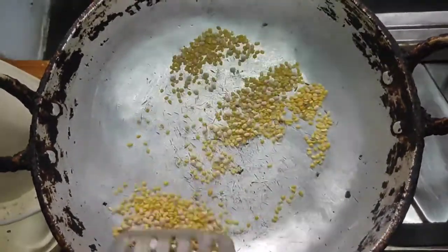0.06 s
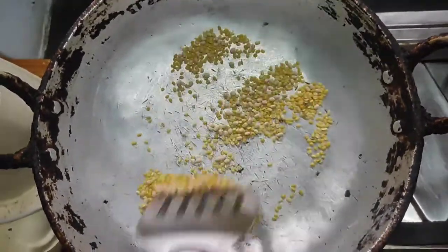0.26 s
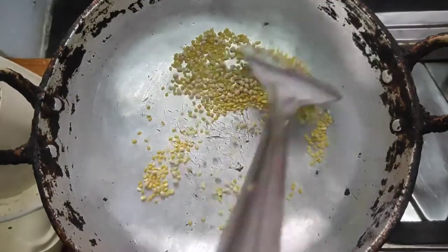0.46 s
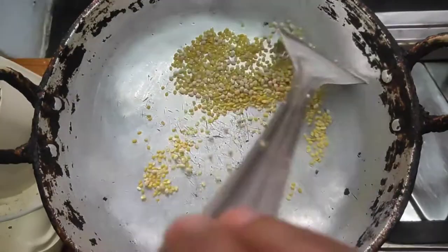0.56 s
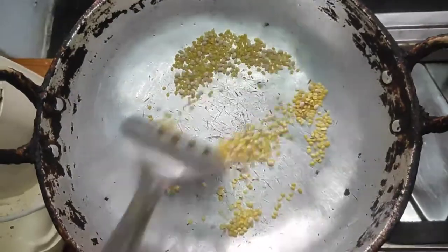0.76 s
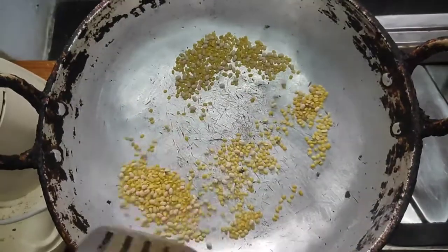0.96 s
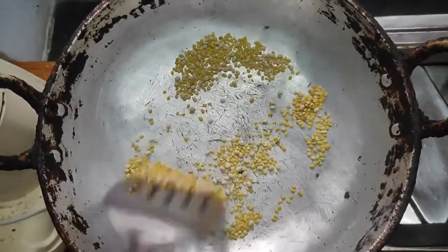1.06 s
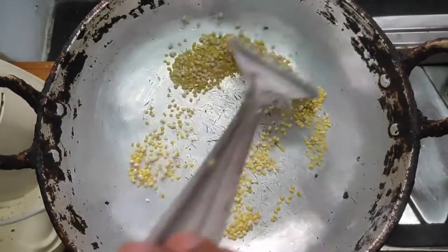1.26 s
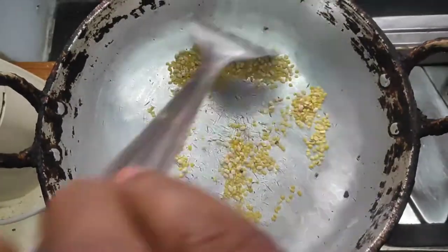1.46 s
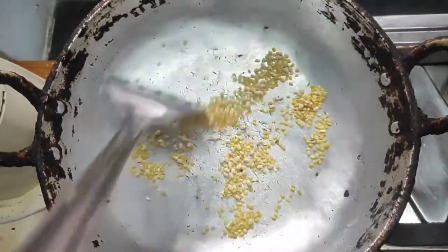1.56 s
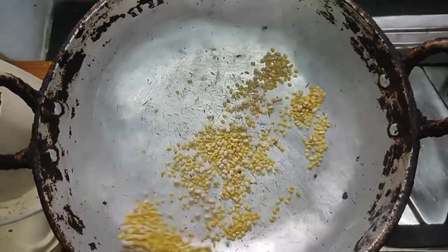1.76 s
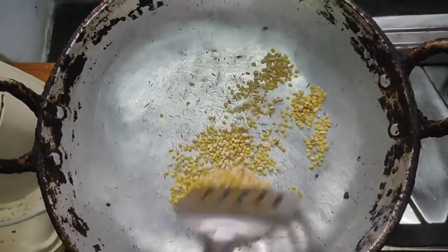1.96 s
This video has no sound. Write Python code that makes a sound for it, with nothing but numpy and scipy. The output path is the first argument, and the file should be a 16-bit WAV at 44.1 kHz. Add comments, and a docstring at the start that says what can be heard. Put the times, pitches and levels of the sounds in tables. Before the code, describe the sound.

A steel spatula knocks and scrapes in a metal pan, heard up close in a small kitchen. Strokes land at about 0.2, 0.6, 1.0 and 1.4 seconds, each with a chattering clank, brief ringing and tiny squeaks. Dry lentils slide and patter softly throughout, continuing after the scraping stops near 1.6 seconds. A soft, dull rub follows at 1.9 seconds, over a faint burner rush and hum.

```python
"""Stirring lentils in a pan

A slotted steel spatula stirs dry lentils in a metal pan on a stove, heard from just above the pan.
Each stroke lands with a chattering knock and scrapes on, ringing the pan; the lentils slide and patter.
The steel edge squeaks, hard pushes rock the pan, and at the end the spatula rubs over the rim.
A small kitchen echoes, over a faint hum and the low rush of the burner."""
import sys
import numpy as np
from scipy import signal
from scipy.fft import rfft, irfft, next_fast_len
from scipy.io import wavfile
from scipy.ndimage import map_coordinates

SR = 44100
rng = np.random.default_rng(int(sys.argv[2]) if len(sys.argv) > 2 else 0)


def generate_wav(sig):
    """Save sig (samples, or channels by samples) to the path in sys.argv[1] as 16-bit PCM at SR."""
    pcm = np.round(np.clip(np.atleast_2d(sig).T, -1, 1) * 32767).astype(np.int16)
    wavfile.write(sys.argv[1], SR, pcm)


N = 88200
RING = SR // 2  # samples allowed for a ring to die away
TOP_HZ = 8700


def amp(db):
    """Turn decibels into a gain."""
    return 10 ** (np.asarray(db) / 20)


def unit(x):
    """Scale a sound to an average (rms) level of 1."""
    return x / np.sqrt(np.mean(x ** 2) + 1e-20)


def along(points, hz):
    """Read between (f/Hz, value) points on a log frequency axis."""
    f, values = np.transpose(points)
    return np.interp(np.log(hz + 1), np.log(f + 1), values)


def sides(db):
    """Left and right gains for a balance in dB; positive is louder on the left."""
    return amp(np.array([[db], [-db]]) / 2)


def add(out, start_s, x):
    """Mix x into out at the given time."""
    i = round(start_s * SR)
    out[:, i:i + x.shape[1]] += x[:, :N - i]


def colour(x, points):
    """Shape the tone by (f/Hz, level/dB) points, with no ringing ahead of a hit."""
    n = x.shape[-1]
    m = 2 * next_fast_len(n)
    gain = amp(along(points, np.fft.rfftfreq(m, 1 / SR)))
    cepstrum = irfft(np.log(gain), m)
    cepstrum[1:m // 2] *= 2
    cepstrum[m // 2 + 1:] = 0
    return irfft(rfft(x, m) * np.exp(rfft(cepstrum)), m)[..., :n]


def wobble(size, per_s):
    """A smooth random curve through per_s points a second."""
    return map_coordinates(rng.standard_normal(128), [np.arange(size) * per_s / SR], mode='wrap')


def ticks(size, per_s, spread_db):
    """Tiny hits at random times, some stronger than others."""
    hits = rng.random(size) < per_s / SR
    return hits * rng.choice([-1, 1], size) * amp(spread_db * rng.standard_normal(size))


# How alike the two ears hear noise: f/Hz, likeness (1 = the same)
EAR_LIKENESS = [(100, 0.98), (450, 0.81), (700, 0.42), (1000, 0), (8000, 0.018)]
def stereo_noise(size):
    """White noise, alike on both sides in the bass and unrelated in the treble."""
    likeness = along(EAR_LIKENESS, np.fft.rfftfreq(size, 1 / SR))
    turn = np.arccos(np.clip(likeness, -1, 1)) / 2
    mid, side = irfft(rfft(rng.standard_normal((2, size))) * [np.cos(turn), np.sin(turn)], size)
    return np.array([mid + side, mid - side])


# The kitchen's echo: f/Hz, t60/s (the time it takes to fade by 60 dB)
ECHO_TIMES = [(150, 0.94), (400, 0.46), (1000, 0.27), (2700, 0.43), (7000, 0.47)]
def kitchen(x, echo_db):
    """Add the room's echo, which lasts longest in the bass."""
    hz, t, spectrum = signal.stft(stereo_noise(RING), SR, nperseg=256)
    fade = amp(-60 * t / along(ECHO_TIMES, hz)[:, None])
    rise = 1 - np.exp(-t / 0.0022)
    tail = signal.istft(spectrum * fade * rise, SR, nperseg=256)[1]
    echo = signal.fftconvolve(x, tail / np.linalg.norm(tail[0]), axes=1)
    return x + amp(echo_db) * echo[:, :x.shape[1]]


# The pan's high ringing tones: f/Hz, level/dB, t60/s, balance/dB, left ear's lead/rad
PAN_TONES = [(2157.5, -9.5, 0.12, 19.5, 3.5), (2205, -6, 0.094, -8, 1.44), (2759, 0, 0.061, -7.5, -3),
             (2825, -1.5, 0.098, -2.5, -1), (3600, -9, 0.14, -0.5, -2), (3870, -14, 0.16, -11, 4),
             (5310, -8.5, 0.12, -10.5, -4), (5450, -9.5, 0.081, -7, 2.5), (6034, -5, 0.11, -7.5, 1),
             (6365, -8.5, 0.092, -3.5, -0.5), (6520, -3, 0.039, -4.5, 0.2), (6710, 0.5, 0.05, -9.5, -3.5),
             (7260, -6, 0.073, -2, 0)]
# The low ring of the pan's body on the stove: f/Hz, level/dB, t60/s
BODY_TONES = [(109, -21, 0.43), (199.7, -17.5, 0.56), (267.8, -27.5, 1), (319.8, -14, 0.16),
              (430.8, -9.5, 0.18), (477.2, -13.5, 0.28), (574, -18.5, 0.35), (703.5, -9, 0.2),
              (797, -26.5, 0.23), (912, -26.5, 0.46), (1197, -22.5, 0.21), (1330, -35, 0.48)]
# The crowd of short-lived tones in between: f/Hz, level/dB
CLATTER_COLOUR = [(40, -25.5), (100, -2.5), (190, 1), (280, 4.5), (400, 4.5), (600, 4.5), (1000, -2.5),
                  (1300, -8), (1650, -12.5), (2200, -5.5), (2800, -2.5), (3200, -7), (4800, -8),
                  (6500, 2.5), (7600, -2.5)]
def pan_ring(spot_db):
    """Pan and stove answer one tap; the spot that is hit sets how much they ping, boom and bong."""
    def boost(hz):
        """Extra dB for a tone near the ping, boom or bong pitch, in that order."""
        return sum(db for db, spot_hz in zip(spot_db, (2180, 199, 700)) if abs(hz / spot_hz - 1) < .06)

    t, ring = np.arange(RING) / SR, np.zeros((2, RING))
    for hz, db, t60, balance, lead in PAN_TONES:
        waver_hz = 24.7 * wobble(RING, per_s=94)  # the pressing blade bends the pan's tones
        phase = 2 * np.pi * np.cumsum(hz + waver_hz) / SR
        level = amp(db + boost(hz) + rng.normal(0, 0.57) - 60 * t / t60)
        ring += sides(balance) * level * np.sin(phase + lead * np.array([[.5], [-.5]]))
    for hz, db, t60 in BODY_TONES:
        level = amp(db + boost(hz) + rng.normal(0, 1.5) - 60 * t / t60)
        ring += level * np.cos(2 * np.pi * hz * t)
    clatter = unit(stereo_noise(RING) * amp(-60 * t / 0.083))
    click = amp(-13.5) * unit(1. * (t == 0))
    return ring + amp(-9) * unit(colour(clatter + click, CLATTER_COLOUR))


# How loudly the lentils slide: t/s, level/dB
SLIDE_LEVELS = [(0, -51), (.05, -53.5), (0.084, -48), (.12, -60.5), (.19, -57), (.3, -54.5), (.46, -56),
                (.56, -61), (.7, -44.5), (.81, -62), (.88, -46.5), (.94, -59.5), (1.1, -61.5), (1.29, -51),
                (1.35, -62), (1.559, -46), (1.68, -53), (2, -54)]
# The bright tone of their patter: f/Hz, level/dB
LENTIL_COLOUR = [(200, -35.5), (1500, -54.5), (2200, -33.5), (3200, -18.5), (4300, -8.5), (5500, -3),
                 (6400, -2), (7500, -3)]
def lentils():
    """Many light grains slide and hop on the metal, faintly ringing it."""
    slide = amp(np.interp(np.arange(N) / SR, *np.transpose(SLIDE_LEVELS)))
    grains = slide * ticks(N, per_s=1100, spread_db=4.5)
    tap = stereo_noise(RING) * amp(-60 * np.arange(RING) / SR / 0.026)
    one_grain = unit(tap) + amp(-1) * unit(pan_ring(spot_db=()))
    patter = signal.fftconvolve(grains[None], one_grain, axes=1)[:, :N]
    patter = signal.sosfilt(signal.butter(6, TOP_HZ, fs=SR, output='sos'), colour(patter, LENTIL_COLOUR))
    return np.sqrt(np.mean(slide ** 2)) * sides(-3) * unit(kitchen(patter, echo_db=-7))


# The pan's faint ring under hopping lentils: t/s, level/dB
SING_LEVELS = [(0, -62), (.18, -75.5), (.48, -60), (.56, -69.5), (.75, -62), (.81, -63), (0.949, -73),
               (1.25, -71), (1.36, -74), (1.64, -65.5), (1.7, -63.5), (1.8, -72), (1.901, -91), (2, -82)]
def singing_pan():
    """Single lentils hop and keep the lowest of the pan's high tones ringing."""
    level = amp(np.interp(np.arange(N) / SR, *np.transpose(SING_LEVELS)))
    hops = ticks(N, per_s=330, spread_db=2.5)
    ring = signal.fftconvolve(hops[None], pan_ring(spot_db=[4.5]), axes=1)[:, :N]
    band = signal.butter(5, (1950, 3900), 'band', fs=SR, output='sos')
    return level * unit(signal.sosfilt(band, ring))


# The tone of the burner's rush: f/Hz, level/dB
BURNER_COLOUR = [(25, -12.5), (50, -11.5), (85, -3.5), (125, -4.5), (165, -3.5), (260, -1.5), (400, -8),
                 (750, -9), (1000, -17.5), (1300, -40.5), (4000, -49.5)]
def burner():
    """The burner gives a low, steady rush with a slight flutter."""
    flutter_db = 1.72 * wobble(N, per_s=11.53)
    return amp(-54 + flutter_db) * unit(colour(stereo_noise(N), BURNER_COLOUR))


# Background tones: f/Hz, level/dB
HUM_TONES = [(129, -60), (266, -61.5), (562, -71)]
def hum():
    """Low tones swell and fade at random in the background."""
    out, t = np.zeros(N), np.arange(N) / SR
    for hz, db in HUM_TONES:
        drift = wobble(N, per_s=6.91) + 1j * wobble(N, per_s=6.91)
        out += amp(db) * unit(np.real(drift * np.exp(2j * np.pi * hz * t)))
    return out


def blade_on_pan(force, levels_db, spot_db, span_s):
    """A force rings the pan; the blade's angle sets the low thud, middle clang and high zing."""
    thud_top_hz, clang_top_hz = 1528, 4370
    ring = signal.fftconvolve(force[None], pan_ring(spot_db), axes=1)
    bands = [(thud_top_hz, 'low'), ([thud_top_hz, clang_top_hz], 'band'), ([clang_top_hz, TOP_HZ], 'band')]
    parts = [signal.sosfilt(signal.butter(4, *band, fs=SR, output='sos'), ring) for band in bands]
    mix = sum(amp(db) * unit(part) for db, part in zip(levels_db, parts))
    return mix * np.sqrt(span_s * SR / ring.shape[1])  # levels count as if all the sound fell in span_s


# Each landing: t/s, thud/dB, clang/dB, zing/dB, chatter/s, balance/dB, extra ping/dB, boom/dB, bong/dB
BLADE_KNOCKS = [(0.2007, -34.5, -47.5, -32, 0.0025, -1, -0.5, 7, -4.5),
                (0.2411, -37, -43, -27.5, 0.011, -1, 5, 10, -4),
                (0.327, -45, -43.5, -57.5, 0.0075, -1, 6, 0, -4),
                (0.3772, -34, -33.5, -42.5, 0.00082, 0, 7, 2.5, -7.5),
                (0.5796, -30, -30.5, -27, 0.0052, -1.5, -0.5, 8, -0.5),
                (0.659, -37.5, -58, -41, 0.0067, -1, -7.5, 6, 3.5),
                (0.666, -40.5, -42.5, -43.5, 0.0079, -3.5, -5, -3, 2.5),
                (0.740, -56, -47.5, -51.5, 0.01, -2, 9, 0.5, -3.5),
                (0.9691, -43.5, -44.5, -27, 0.02, -2.5, 6.5, 4.5, 11),
                (0.995, -63, -60, -35.5, 0.0059, 8.5, -4, 0, 6),
                (1.0415, -35, -49, -36.5, 0.0084, 1, 4.5, -11, 6.5),
                (1.1215, -49.5, -32, -37.5, 0.02, -0.5, 4.5, -8.5, 2),
                (1.1325, -38.5, -39.5, -40, 0.00067, -0.5, 6, -11.5, -1.5),
                (1.3764, -37, -38, -34.5, 0.011, -4.5, 5, 4, 5),
                (1.400, -41.5, -47.5, -43, 0.0076, 3, 1, 4, 3),
                (1.492, -49.5, -74, -39.5, 0.029, -6.5, 4, -3, 2)]
def knocks():
    """The blade lands and chatters in tiny, quick bounces."""
    out, t = np.zeros((2, N)), np.arange(SR // 8) / SR
    for start, thud, clang, zing, chatter_s, balance, *spot_db in BLADE_KNOCKS:
        bounces = 0.36 * ticks(len(t), per_s=1500, spread_db=1.5) * np.exp(-(t / chatter_s) ** 2)
        force = (t == 0) + bounces
        knock = blade_on_pan(force, (thud, clang, zing), spot_db, span_s=0.018)
        add(out, start, sides(balance) * kitchen(knock, echo_db=-9))
    return out


# Each squeak: t/s, length/s, f/Hz, level/dB, balance/dB, left ear's lead/rad
EDGE_SQUEAKS = [(0.238, 0.021, 6240, -40.5, 0.5, 0.7), (0.24, 0.015, 5480, -39, -7, 3.5),
                (0.327, .010, 2210, -45.5, -3, 1), (0.5783, 0.01, 6550, -23.5, -9, 1.1),
                (0.5788, 0.0093, 2764, -29, -14.5, -3.5), (0.669, 0.012, 7160, -37, -10, 1.5),
                (0.691, 0.013, 7160, -37, -13.5, 1), (0.721, .045, 6100, -53, -13.5, 1.2),
                (0.971, 0.0089, 6690, -24.5, -8, -3.1), (0.971, .026, 5310, -33.5, -6, -2),
                (0.995, 0.0087, 6725, -33, -8.5, -0.5), (1.121, 0.013, 6000, -36.5, -14, 1.2),
                (1.123, .012, 2780, -36, -8.5, -2), (1.378, 0.017, 2802, -41.5, -12.5, -2.5),
                (1.49, .022, 6134, -39, -14, 1), (1.505, .014, 6365, -49, -10, 2),
                (1.501, 0.028, 7195, -45, -18, -2.5)]
def squeaks():
    """The steel edge briefly catches and drives one tone of the metal, which then rings out."""
    rise_s, t60, jitter_rad = 0.00047, 0.018, 0.053
    out, t = np.zeros((2, N)), np.arange(RING) / SR
    for start, length, hz, db, balance, lead in EDGE_SQUEAKS:
        phase = 2 * np.pi * hz * t + jitter_rad * np.cumsum(rng.standard_normal(RING))
        level = (1 - np.exp(-t / rise_s)) * amp(db - 60 * np.maximum(t - length, 0) / t60)
        squeak = sides(balance) * level * np.sin(phase + lead * np.array([[.5], [-.5]]))
        add(out, start, kitchen(squeak, echo_db=-11.5))
    return out


# Each scrape: t/s, length/s, thud/dB, clang/dB, zing/dB, fade/dB, extra ping/dB, boom/dB, bong/dB
BLADE_SCRAPES = [(0.25, 0.079, -42.5, -49, -50.5, 15, -10.5, 8, -3),
                 (0.395, 0.15, -60.5, -65, -54.5, 5.5, -9.5, -0.5, -3.5),
                 (0.595, 0.1, -41, -50, -47.5, 11, -16.5, -2, 1.5),
                 (0.678, 0.073, -48, -51, -44.5, -8, 1.5, 10.5, -0.5),
                 (0.974, 0.056, -47, -53.5, -45, 4, -11, -8, 11),
                 (1.045, 0.095, -42, -46, -44.5, -2, -11.5, -13, 0.5),
                 (1.134, 0.03, -53.5, -42.5, -47, -2.5, 9.5, -12, -2),
                 (1.403, 0.081, -50.5, -59.5, -49.5, -7.5, -3, -3, -2),
                 (1.501, 0.078, -50.5, -53, -46.5, 9, -10, -0.5, 1.5)]
def scrapes():
    """The blade sticks and slips across the pan as the pressure eases (or grows, if fade is negative)."""
    rise_s, fall_s = 0.0026, 0.0081
    out, t = np.zeros((2, N)), np.arange(SR // 4) / SR
    for start, length, thud, clang, zing, fade_db, *spot_db in BLADE_SCRAPES:
        pressure = (1 - np.exp(-t / rise_s)) * amp(-fade_db * t / length)
        release = np.exp(-np.maximum(t - length, 0) / fall_s)
        slips = pressure * release * ticks(len(t), per_s=780, spread_db=4.5)
        scrape = blade_on_pan(slips, (thud, clang, zing), spot_db, length)
        add(out, start, kitchen(scrape, echo_db=-5))
    return out


# The hardest pushes: t/s, level/dB
HARD_PUSHES = [(0.584, -50), (0.656, -52.5), (1.380, -45.5)]
# The deep tone of the pan's stand: f/Hz, level/dB
STAND_COLOUR = [(40, -20.5), (85, 1.5), (130, -4), (190, -4.5), (300, -20.5), (800, -60)]
def thumps():
    """A hard push rocks the pan on its stand with a short, dull shudder."""
    rise_s, t60 = 0.0095, 0.59
    out, t = np.zeros((2, N)), np.arange(RING) / SR
    for start, db in HARD_PUSHES:
        level = (1 - np.exp(-t / rise_s)) * amp(db - 60 * t / t60)
        add(out, start, level * unit(colour(stereo_noise(RING), STAND_COLOUR)))
    return out


# The tone of the rub on the rim: f/Hz, level/dB
RUB_COLOUR = [(30, -28), (70, -29), (110, 6.5), (200, -2), (330, 0), (600, -11), (900, -12), (1200, -54.5),
              (4000, -57)]
def rim_rub():
    """The spatula is drawn back over the rim with a dull rub."""
    start_s, rise_s = 1.905, 0.0016
    t = np.maximum(np.arange(N) / SR - start_s, 0)
    return amp(-48) * (1 - np.exp(-t / rise_s)) * unit(colour(stereo_noise(N), RUB_COLOUR))


def scene():
    """Spatula, lentils and the kitchen's background together."""
    spatula = knocks() + thumps() + scrapes() + squeaks() + rim_rub()
    return spatula + lentils() + singing_pan() + burner() + hum()


# How well the microphone hears each pitch: f/Hz, level/dB
MIC_COLOUR = [(20, -11), (45, -7), (90, -2), (7200, -3), (7600, -5), (7850, -14.5), (8050, -30),
              (8400, -42)]
def record(dry):
    """The microphone softens the deep bass and cuts off the high treble."""
    m = next_fast_len(N + RING)
    hz = np.fft.rfftfreq(m, 1 / SR)
    return irfft(rfft(colour(dry, MIC_COLOUR), m) * (hz < TOP_HZ), m)[:, :N]


dry = scene()
out = record(dry)
generate_wav(out)
```